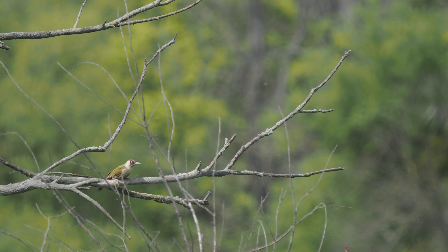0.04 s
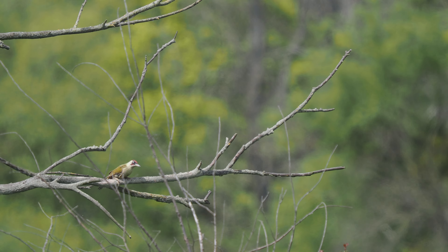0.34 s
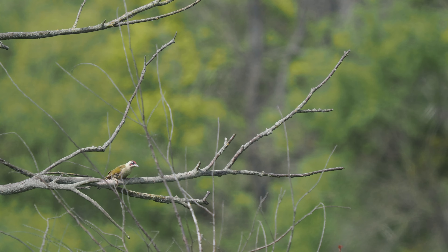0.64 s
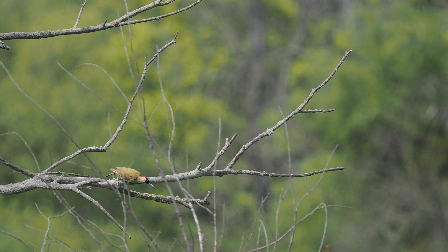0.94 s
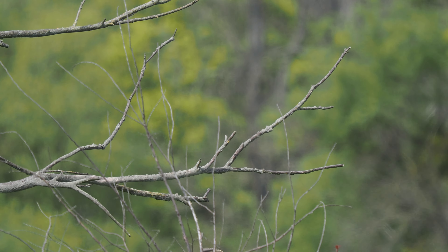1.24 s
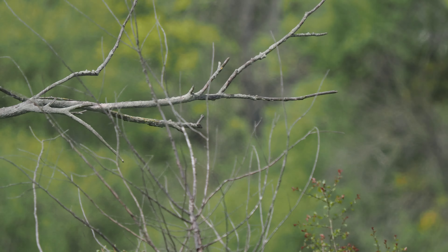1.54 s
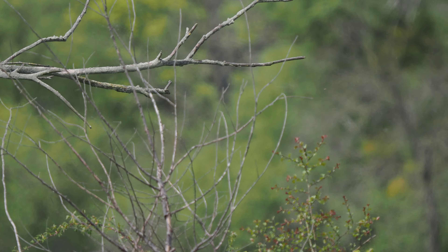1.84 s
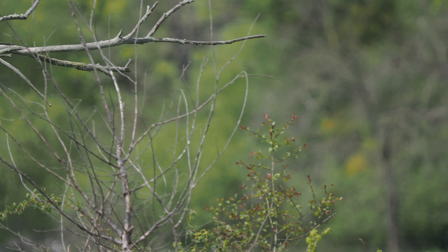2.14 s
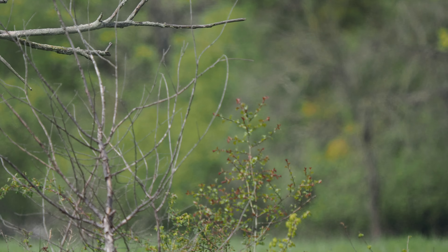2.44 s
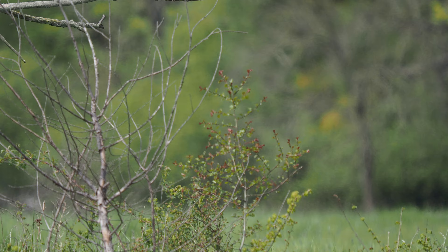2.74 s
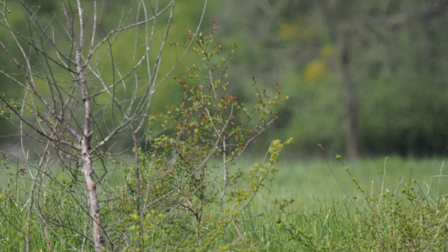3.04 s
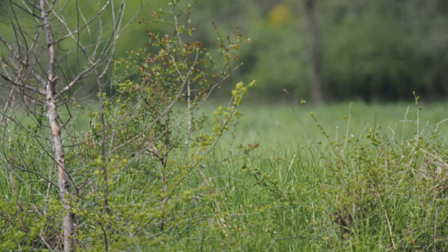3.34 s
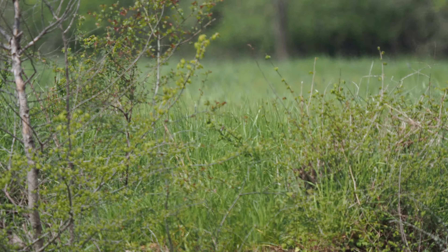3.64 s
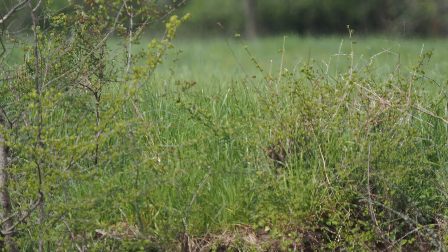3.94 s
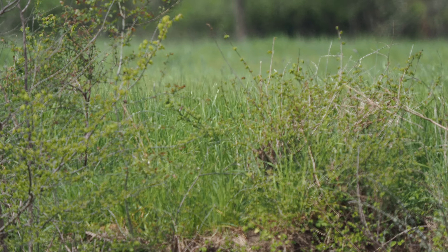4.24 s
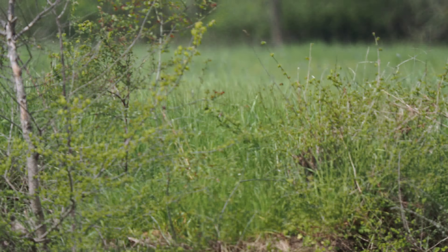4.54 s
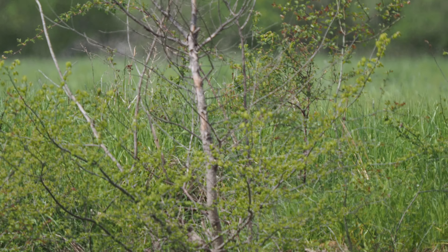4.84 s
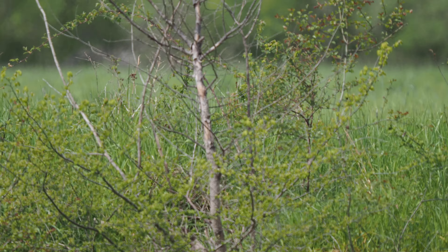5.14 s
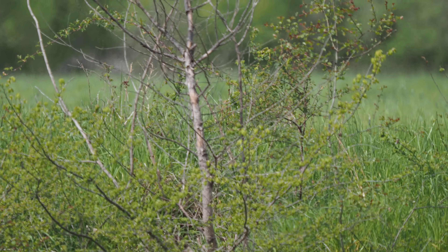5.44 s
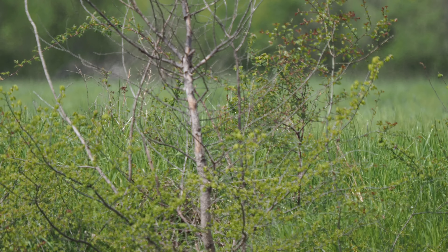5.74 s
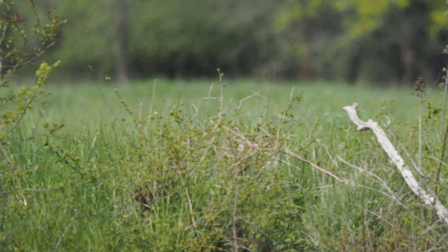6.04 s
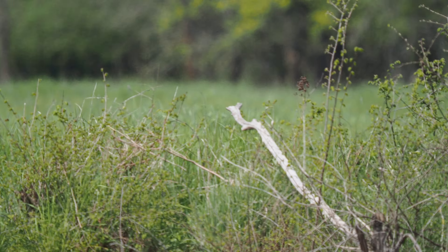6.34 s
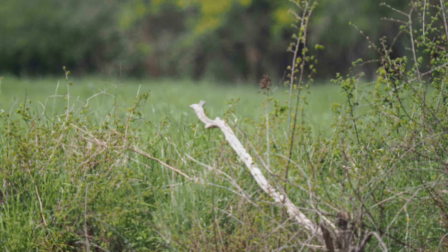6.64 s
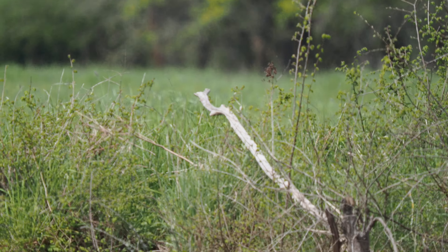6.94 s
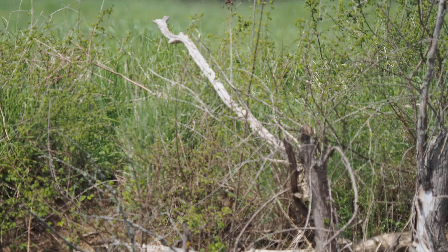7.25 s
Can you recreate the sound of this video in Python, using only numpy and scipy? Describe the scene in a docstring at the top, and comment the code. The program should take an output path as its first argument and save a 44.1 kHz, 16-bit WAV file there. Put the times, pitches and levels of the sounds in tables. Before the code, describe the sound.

A small bird sings rising buzzy notes, then other birds chirp and chatter over gusts of wind rumbling on the microphone.

```python
"""Meadow edge. Throughout: gusts buffet mainly the right microphone port, over steady air and a faint whine.
0-1 s: a small bird close by sings six buzzy notes that climb in pitch and grow louder.
1-5 s: far birds answer with a thin whistle, then faint flicks, twitter, arched chirps and peeps.
From 3 s a distant rush swells and fades. From 4.9 s a scratchy bird runs through chits, slurs, a rattle
and hooked syllables, with one soft tap at 5.3 s. At 7 s: two volleys of quick ticks."""
import sys
import numpy as np
from scipy import signal
from scipy.fft import rfft, irfft, next_fast_len
from scipy.io import wavfile
from scipy.ndimage import uniform_filter1d, map_coordinates

SR = 44100
rng = np.random.default_rng(int(sys.argv[2]) if len(sys.argv) > 2 else 0)


def waveform_to_disk(signal):
    """Save audio, clipped to [-1, 1], as 16-bit WAV at the path in sys.argv[1]."""
    frames = np.transpose(np.atleast_2d(signal))
    scaled = np.clip(frames, -1, 1) * 32767
    samples = np.round(scaled).astype(np.int16)
    wavfile.write(sys.argv[1], SR, samples)


N = 325458

# noise spectra (frequency [Hz], relative density [dB])
AIR_SPECTRUM = [(190, -53), (330, -11), (420, -2), (570, -7), (813, -4), (1000, -2), (1260, -7.5),
                (2000, -8.5), (2210, -12.5), (5350, -15.5), (6090, -21), (8680, -16.5), (15500, -26)]
TAP_SPECTRUM = [(500, -25), (790, 0), (1050, -12), (1450, -4), (2300, -22), (6000, -45)]
BUFFET_SPECTRUM = [(12, -61), (20, -22.5), (38, 2.5), (113, 3), (184, -3.5), (228, -10.5), (287, -20.5),
                   (313, -20.5), (347, -44), (420, -33), (620, -100)]
FLUTTER_SPECTRUM = [(100, -47), (180, -1), (250, 2.5), (350, -19.5), (450, -16), (570, -28), (700, -25.5),
                    (1000, -53), (2000, -80)]
THUMP_SPECTRUM = [(150, -32), (260, 5.5), (350, 1), (470, -1), (720, -18), (2000, -62)]
CLICK_SPECTRUM = [(4000, -25), (6400, 0), (8000, -2), (8800, -22), (15000, -35)]
CHIT_SPECTRUM = [(1800, -16), (2800, -4), (4100, -4.5), (4700, 4), (5700, 6.5), (6600, -5), (8500, -10),
                 (10000, -24), (12200, -11.5), (15500, -27)]
RASP_SPECTRUM = [(1800, -24), (2850, -5), (3450, -5.5), (4250, -4), (4800, -3), (5600, -9), (6400, -17),
                 (9000, -30), (12000, -21), (15500, -42)]
# diffuse field (frequency [Hz], left-right correlation [ratio])
COHERENCE = [(300, 0.77), (640, 0.8), (1400, 0.3), (3100, -0.4), (6000, 0.023), (15000, -0.12)]
# balance of the air (frequency [Hz], left minus right [dB])
AIR_BALANCE = [(400, 4), (1300, -4.5), (3000, -1), (5000, 0.5), (8000, 1), (14000, -6)]
# decay among the trees (frequency [Hz], T60 [s])
TREE_DECAY = [(500, 0.23), (4000, 0.43), (10000, 0.035)]
# swells of the rush (time [s], width [s], centre [Hz], level [dB])
RUSH_SWELLS = [(3.22, 0.4, 1130, -53.5), (4.7, .22, 910, -52.5), (5.25, 0.3, 920, -57.5),
               (6.38, 0.24, 1070, -47.5)]
# spectrum of a swell (frequency over centre [ratio], relative density [dB])
RUSH_SPECTRUM = [(.3, -16), (.6, -9), (.85, -1), (1.1, 0), (1.4, -6), (2, -15), (4, -29), (8, -48)]

# wind at the right port, and puffs on top (time [s], strength [dB])
GUSTS = [(0, -17), (.08, -14), (.39, -14.5), (.47, -18), (.75, -24), (1.12, -32.5), (1.4, -30),
         (1.75, -24.5), (2.08, -34), (2.35, -26.5), (2.8, -22), (3.2, -31), (3.33, -25), (3.45, -14.5),
         (3.58, -20.5), (3.64, -10.5), (3.8, -17), (4.1, -17.5), (4.5, -23), (4.8, -17), (4.95, -23),
         (5.08, -33.5), (5.42, -32.5), (5.55, -25.5), (5.85, -22), (6.3, -27.5), (6.55, -29), (6.9, -17),
         (7.1, -23), (7.25, -30.5)]
PUFFS = [(0.599, -15), (.79, -22), (.9, -20.5), (1.523, -20.5), (1.69, -20.5), (1.81, -20), (1.96, -23),
         (2.19, -23.5), (2.259, -22.5), (2.48, -24.5), (2.76, -20), (2.898, -21), (3.001, -19),
         (4.44, -20.5), (4.59, -17), (5.32, -24), (5.5, -22.5), (5.65, -18.5), (5.76, -24.5), (6.64, -23.5),
         (6.96, -21.5), (7.07, -17), (7.34, -24)]
# shelter of the left port (time [s], level re wind strength [dB])
LEE = [(0.0, -9.5), (0.18, -23), (1.28, -15), (1.5, -24.5), (2.94, -25), (3.2, -8), (3.38, -22.5),
       (5.12, -5.5), (5.56, -23.5), (6.26, -11), (7.06, -27), (7.36, -20)]
# harder wind makes smaller eddies (frequency [Hz], gain per strength [dB/dB])
BUFFET_GROWTH = [(45, 0.37), (130, 1.17), (260, 1.92)]
# eddies, before the port's gain (time [s], push [dB], flutter [dB])
EDDIES = [(0.237, -16, -33), (0.292, -10, -35), (0.334, -12, -38), (0.378, -9, -32), (0.415, -9.5, -49),
          (1.816, -19, -46), (3.435, -11, -41), (3.617, -15, -40), (3.639, -6, -37), (3.661, -8, -33.5),
          (3.697, -6, -32), (3.716, -8, -32), (3.857, -14, -41.5), (3.884, -10, -47), (3.935, -8.5, -35.5),
          (4.063, -8, -49), (4.158, -12, -38.5), (4.217, -11, -33.5)]

# syllable shapes (time [s], pitch [ratio], relative level [dB])
THIN_WHISTLE = [(0, 1.06, -14), (.035, 1, -4), (.1, .995, -2), (.2, 1.003, 0), (.3, 1.008, -2),
                (.32, 1, -16)]
PEEP = [(0, 1, -12), (.03, 1, 0), (.09, 1.005, 0), (.115, 1.01, -12)]
ARCH = [(0, .9, -14), (.025, 1, -3), (.042, 1, 0), (.06, .88, -1), (.078, .72, -12)]
SLUR = [(0, 1.13, -14), (.011, 1.06, -3), (.021, .995, 1.5), (.033, .96, -1), (.045, .945, -14)]
HOOK = [(0, .94, -12), (.012, .98, -3), (.019, 1.04, 1), (.026, 1.07, 0), (.036, 1.1, -10)]
TICK = [(0, 1.3, -12), (.004, 1.08, 0), (.007, .92, 0), (.011, .74, -12)]
PIP = [(0, 1.04, -12), (.003, 1, 0), (.007, .96, -12)]
LEAD_IN = [(0, 1, -16), (.012, 1.004, -6), (.024, 1, 0), (.031, .985, -10)]
# far peeps (time [s], pitch [Hz], level [dB], length [s])
FAR_PEEPS = [(3.445, 4150, -66, .035), (3.755, 4250, -67, .03), (3.905, 4040, -64, .045),
             (4.02, 4050, -64, .06), (4.925, 2890, -65, .115)]
# far upward flicks and arched chirps (time [s], pitch [Hz], level [dB])
FAR_FLICKS = [(2.005, 2500, -66), (2.512, 3100, -67), (2.84, 4850, -61)]
FAR_ARCHES = [(2.878, 4050, -58.5), (3.775, 2616, -63), (4.05, 2700, -66), (4.145, 3950, -68),
              (4.21, 2620, -63)]
# tick volleys (time [s], ticks [count], pitch [Hz], level [dB])
VOLLEYS = [(7.012, 5, 3240, -45), (7.318, 3, 3260, -40.5)]
# double chits (time [s], level [dB], earlier stroke re level [dB], ring re strokes [dB])
CHITS = [(4.858, -42, -3.5, -4), (5.048, -39, -6, -1), (6.912, -42, -1.5, -18), (7.2, -41, -2.5, -11)]
# falling slurs (time [s], pitch [Hz], base level [dB], length [s])
SLURS = [(5.206, 3350, -43.5, 0.028), (5.31, 3400, -46.5, 0.04), (5.424, 3360, -44.5, 0.039),
         (5.54, 3480, -44, .037), (5.658, 3380, -44.5, 0.041), (5.774, 3300, -44.5, 0.044)]
# side tones of a slur (pitch [ratio], level re base [dB], delay [s])
SLUR_TONES = [(1.5, -0.5, -0.019), (0.75, -15, -.016)]
# hoarse tones under a hook (delay [s], pitch [Hz], level [dB])
HOOK_TONES = [(0.024, 4290, -44.5), (0.0195, 2890, -59), (.041, 2850, -54), (0.044, 4250, -54)]
# notes of the near bird (time [s], pitch [Hz], level [dB])
SONG = [(.000, 4350, -38.5), (0.172, 4540, -37), (0.353, 4730, -34.5), (.529, 4850, -30),
        (.704, 4886, -29.5), (.879, 4917, -30.5)]
# steps from lead-in to buzz (delay [s], pitch [ratio], level re note [dB])
PIPS = [(0.029, 1.29, -19), (0.036, 1.204, -23)]


def amp(db):
    """Decibels to gain."""
    return 10 ** (np.asarray(db) / 20)


def unit(x):
    """Scale to rms 1."""
    return x / np.sqrt(np.mean(x ** 2) + 1e-20)


def along(points, hz):
    """Interpolate (frequency [Hz], value) points on a log axis."""
    knots_hz, values = np.transpose(points)
    return np.interp(np.log(hz + 1), np.log(knots_hz + 1), values)


def curves(rows, size=N):
    """One value per sample for each column after the time."""
    times_s, *columns = np.transpose(rows)
    return [np.interp(np.arange(size) / SR, times_s, column) for column in columns]


def wobble(rate_hz, size=N):
    """Smooth random curve, rate_hz knots a second."""
    knots = rng.standard_normal(int(size * rate_hz / SR) + 4)
    return map_coordinates(knots, [np.arange(size) * rate_hz / SR])


def filtered(x, response):
    """Apply a frequency response."""
    size = next_fast_len(N + SR // 2)
    return irfft(rfft(x, size) * response(np.fft.rfftfreq(size, 1 / SR)), size)[..., :N]


def noise(spectrum):
    """Coloured noise, rms 1."""
    return unit(filtered(rng.standard_normal(N), lambda hz: amp(along(spectrum, hz))))


def diffuse_noise(spectrum):
    """Partly coherent stereo noise, mid rms 1."""
    def mid_side_gains(hz):
        angle = np.arccos(np.clip(along(COHERENCE, hz), -1, 1)) / 2
        return np.array([np.cos(angle), np.sin(angle)])
    mid, side = filtered(np.array([noise(spectrum), noise(spectrum)]), mid_side_gains)
    return np.array([mid + side, mid - side]) / mid.std()


def pan(left_db):
    """Stereo gains for a left-minus-right level."""
    return amp(np.array([[1], [-1]]) * left_db / 2)


def add(track, at_s, sound):
    """Mix a sound into a track."""
    part = track[max(round(at_s * SR), 0):][:len(sound)]
    part += sound[:len(part)]


def burst(centre_s, width_s, order=2):
    """Bell envelope; a higher order flattens the top."""
    offset = (np.arange(N) / SR - centre_s) / width_s
    return np.exp(-np.minimum(offset ** 2, 40) ** (order // 2) / 2)


def stretched(shape, length_s):
    """Syllable shape scaled to a new length."""
    return [(s * length_s / shape[-1][0], ratio, db) for s, ratio, db in shape]


def sine(pitch_hz):
    """Tone of rms 1 along a pitch curve."""
    return np.sqrt(2) * np.sin(2 * np.pi * np.cumsum(pitch_hz) / SR)


def syllable(shape, hz, db, rough=0., trill_hz=0., swing_hz=0., pulsing=0.):
    """Whistle with pitch jitter (rough); a trill swings pitch and loudness together."""
    size = int(shape[-1][0] * SR)
    ratio, level_db = curves(shape, size)
    trill_rad = 2 * np.pi * trill_hz * np.arange(size) / SR + rng.uniform(0, 2 * np.pi)
    trill_rad += .35 * wobble(83, size)
    pitch_hz = hz * ratio * (1 + rough * wobble(852, size)) + swing_hz * np.sin(trill_rad)
    depth = np.clip(pulsing * (3.5 - level_db / 9), 0, 1)  # a softly blown trill breaks into pulses
    envelope = amp(db + level_db) * (1 + depth * np.sin(trill_rad - .8))
    return envelope * signal.windows.tukey(size, .06) * sine(pitch_hz)


def outdoors(x, left_db, left_lag_ms, wet_db):
    """Sound reaches one port earlier; trees scatter a soft tail back."""
    hz, t, spectra = signal.stft(rng.standard_normal((2, SR // 2)), SR, nperseg=256)
    decay = amp(-60 * t / along(TREE_DECAY, hz)[:, None])
    _, tail = signal.istft(spectra * decay, SR, nperseg=256)
    echo = signal.fftconvolve(x[None], tail / np.linalg.norm(tail[0]), axes=1)[:, :N]
    direct = filtered(x, lambda f: np.exp(np.array([[-1j], [1j]]) * np.pi * f * left_lag_ms / 1000))
    return pan(left_db) * direct + amp(wet_db) * echo


def background():
    """Steady air, swells of a distant rush, a faint whine, one soft tap."""
    air = amp(-53) * filtered(diffuse_noise(AIR_SPECTRUM), lambda hz: pan(along(AIR_BALANCE, hz)))
    rush = np.zeros((2, N))
    for s, width_s, centre_hz, db in RUSH_SWELLS:
        spectrum = [(ratio * centre_hz, density_db) for ratio, density_db in RUSH_SPECTRUM]
        rush += amp(db) * burst(s, width_s, order=4) * diffuse_noise(spectrum)
    whine = amp(-71.5 + 1.1 * wobble(2.75)) * sine(pitch_hz=1998 + 4 * wobble(8.3))
    tap = amp(-44) * burst(5.286, width_s=.004, order=4) * noise(TAP_SPECTRUM)
    return air + rush * pan(left_db=1.1) + whine + tap


def buffet(swing_db):
    """Rumble on one port; upper bands follow the wind more steeply than deep ones."""
    rumble = noise(BUFFET_SPECTRUM)
    rumble /= np.sqrt(np.abs(uniform_filter1d(rumble ** 2, SR // 14)) + 1e-9)  # even out chance swells
    centres_hz, growth = np.transpose(BUFFET_GROWTH)
    crossovers = [list(zip(centres_hz, weights)) for weights in np.eye(len(centres_hz))]
    bands = filtered(rumble, lambda hz: np.array([along(band, hz) for band in crossovers]))
    return np.sum(amp(np.outer(growth, swing_db)) * bands, axis=0)


def thumps(half_width_s=.0015, push_gain_db=2.5, flutter_gain_db=10.5):
    """An eddy hits the port: one pressure push between two shallow dips, with brief flutter."""
    pushes, flutter = np.zeros((2, N))
    t = np.arange(SR // 20) / SR
    offset = (t - t.mean()) / half_width_s
    pulse = (1 - offset ** 2) * np.exp(-offset ** 2 / 2)
    for s, push_db, flutter_db in EDDIES:
        add(pushes, s - t.mean(), amp(push_db + push_gain_db) * pulse)
        flutter += amp(flutter_db + flutter_gain_db) * burst(s, width_s=.0039)
    return pushes + flutter * noise(THUMP_SPECTRUM)


def wind(mid_gust_db=-20, puff_width_s=.022):
    """Turbulence on the ports; hard puffs flutter higher up, the left port lies in the lee."""
    gust_db, = curves(GUSTS)
    lee_db, = curves(LEE)
    puff_power = sum((amp(db) * burst(s, puff_width_s * np.sqrt(2))) ** 2 for s, db in PUFFS)
    strength_db = 10 * np.log10(amp(gust_db) ** 2 + puff_power)
    swing_db = strength_db - mid_gust_db + 3.2 * np.tanh(wobble(34))
    rumble = amp(-1.5) * buffet(swing_db)
    flutter_db = -19.5 + 1.55 * swing_db + 4.3 * np.tanh(wobble(60))
    flutter = amp(flutter_db) * noise(FLUTTER_SPECTRUM)
    right = amp(mid_gust_db) * (rumble + flutter) + thumps()
    left_db = (gust_db + strength_db) / 2 + lee_db + .85 * wobble(5.35)
    return np.array([amp(left_db) * noise(BUFFET_SPECTRUM), right])


def far_birds():
    """Thin whistle and level peeps; deeper in the trees, flicks, arched chirps and twitter."""
    whistles, chirps = np.zeros((2, N))
    add(whistles, 1.08, syllable(THIN_WHISTLE, hz=7370, db=-62, rough=.003))
    for s, hz, db, length_s in FAR_PEEPS:
        add(whistles, s, syllable(stretched(PEEP, length_s), hz, db, rough=.022))
    for shape, calls in ((HOOK, FAR_FLICKS), (ARCH, FAR_ARCHES)):
        for s, hz, db in calls:
            add(chirps, s, syllable(shape, hz, db, rough=.036))
    for when, height, faintness in rng.uniform(size=(30, 3)):  # twitter
        shape = (ARCH, SLUR, HOOK)[rng.integers(3)]
        s = np.interp(when, (0, 1), (2.3, 5.5))
        hz = np.interp(height, (0, 1), (2245, 4280))
        add(chirps, s, syllable(shape, hz, db=-65.5 - 4 * faintness, rough=.04))
    nearer = outdoors(whistles, left_db=-3, left_lag_ms=.015, wet_db=-14)
    return nearer + outdoors(chirps, left_db=-2, left_lag_ms=.015, wet_db=-9)


def ticking_bird(gap_s=.0212):
    """Two volleys of steep, slightly hoarse downward ticks."""
    voice = np.zeros(N)
    for s, count, hz, db in VOLLEYS:
        for k in range(round(count)):
            tick = syllable(TICK, hz * rng.normal(1, .025), db + rng.normal(0, 1), rough=.055)
            add(voice, s + k * gap_s, tick)
    return outdoors(voice, left_db=5, left_lag_ms=-.08, wet_db=-6)


def scratchy_bird(ring_hz=7160, ring_half_width_hz=200):
    """Rough tones and noise strokes with a high ring: a click, chits, slurs, a rattle, hooks."""
    tones, chit_env, ring_env, rasp_env = np.zeros((4, N))
    for s, db, earlier_db, ring_db in CHITS:
        earlier = amp(earlier_db) * burst(s - .021, width_s=.0054)
        strokes = amp(db) * (earlier + burst(s, width_s=.0054))
        chit_env += strokes
        ring_env += amp(ring_db) * strokes
    for s, hz, db, length_s in SLURS:  # a rasp clears into three falling tones
        rasp_env += amp(db - 3) * burst(s - .018, width_s=.0078)
        scrape = burst(s + .009, width_s=.009)
        chit_env += amp(db - 6) * scrape
        ring_env += amp(db - 10) * scrape
        shape = stretched(SLUR, length_s)
        add(tones, s, syllable(shape, hz, db - 1, rough=.028))
        for ratio, tone_db, delay_s in SLUR_TONES:
            add(tones, s + delay_s, syllable(shape, hz * ratio, db + tone_db, rough=.025))
    for s in 5.935 + .0238 * np.arange(13):  # dry rattle
        stroke = amp(-49 + rng.normal(0, 1.9)) * burst(s, width_s=.0078)
        chit_env += stroke
        ring_env += amp(-7.5) * stroke
    rasp_env += amp(-52.5) * burst(6.38, width_s=.23)  # runs on under the hooks
    hook_gap_s, slowing_s = .1075, .0013
    for k in range(5):  # a rising hook breaks into hoarse lower tones
        s = 6.293 + k * (hook_gap_s + k * slowing_s)
        db = -41.5 - k
        add(tones, s, syllable(HOOK, hz=5250, db=db, rough=.036))
        for delay_s, hz, tone_db in HOOK_TONES:
            hoarse = syllable(stretched(PIP, length_s=.018), hz, tone_db + rng.normal(0, 1), rough=.03)
            add(tones, s + delay_s, hoarse)
        rasp_env += amp(db - 7) * (burst(s + .025, width_s=.0055) + .6 * burst(s + .046, width_s=.007))
    click = amp(-45.5) * burst(.831, width_s=.0045, order=4) * noise(CLICK_SPECTRUM)
    ring = filtered(rng.standard_normal(N), lambda hz: 1 / (1 + ((hz - ring_hz) / ring_half_width_hz) ** 2))
    scratch = chit_env * noise(CHIT_SPECTRUM) + ring_env * unit(ring) + rasp_env * noise(RASP_SPECTRUM)
    return outdoors(tones + click + scratch, left_db=6.5, left_lag_ms=-.086, wet_db=-15.5)


def buzz_shape(onset_s=.034, release_s=.12, gate_db_per_s=2000):
    """Syllable shape: the pitch settles from above as the note swells, sags, then flicks up at the cut."""
    t = np.linspace(0, .15, num=100)
    early_s = np.maximum(onset_s - t, 0)
    late_s = np.maximum(t - release_s, 0)
    slide = .17 * np.exp(-np.maximum(t - onset_s, 0) / .0102)
    sag_at_s, sag_width_s = .102, .016
    sag = .0106 * (1 - np.exp(-((t - sag_at_s) / sag_width_s) ** 2 / 2))
    flick = 2 * late_s
    swell_at_s, swell_tau_s = .055, .0087
    swell_db = -28 / (1 + np.exp((t - swell_at_s) / swell_tau_s))
    return np.column_stack([t, 1 + slide + sag + flick, swell_db - gate_db_per_s * (early_s + late_s)])


def near_bird(top_lead_hz=6470, split_hz=250):
    """Each note opens on two soft high tones, steps down in pips and swells into a fast buzz."""
    voice = np.zeros(N)
    top_note_hz = SONG[-1][1]
    for s, hz, db in SONG:
        buzz = syllable(buzz_shape(), hz, db, rough=.006, trill_hz=197.4, swing_hz=210, pulsing=.099)
        add(voice, s, buzz)
        lead_hz = top_lead_hz * (hz / top_note_hz) ** .37
        for side in (-1, 1):  # the two sides of the syrinx sound slightly apart
            add(voice, s, syllable(LEAD_IN, lead_hz + side * split_hz, db - 20, rough=.0056))
        for delay_s, ratio, pip_db in PIPS:
            add(voice, s + delay_s, syllable(PIP, hz * ratio, db + pip_db, rough=.03))
    return outdoors(voice, left_db=1.5, left_lag_ms=.016, wet_db=-26)


def scene():
    """Birds, wind and background, in stereo."""
    return near_bird() + far_birds() + scratchy_bird() + ticking_bird() + wind() + background()


def record(dry):
    """The camera keeps nothing above its band limit."""
    return filtered(dry, lambda hz: hz < 15700)


dry = scene()
out = record(dry)
waveform_to_disk(out)
```